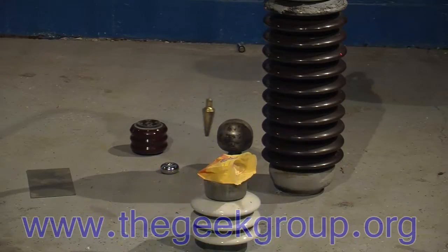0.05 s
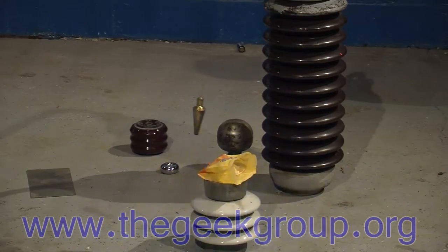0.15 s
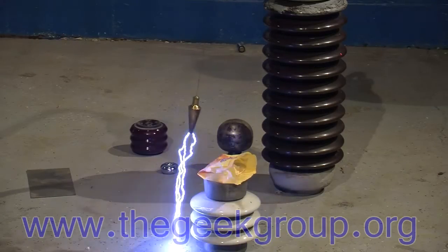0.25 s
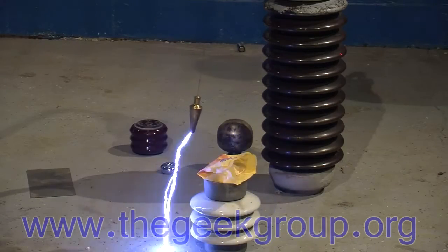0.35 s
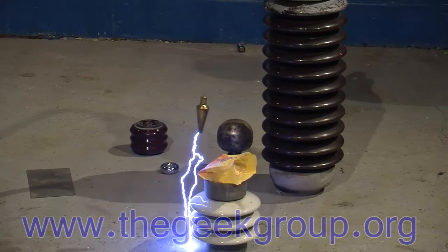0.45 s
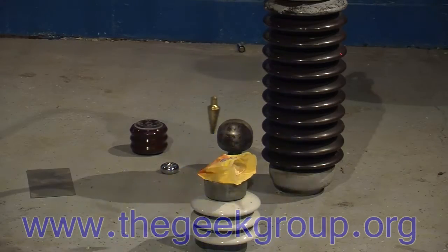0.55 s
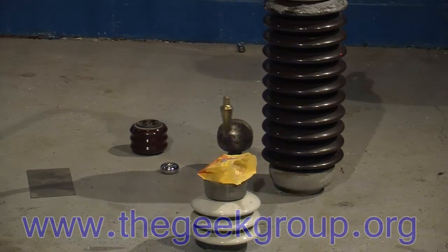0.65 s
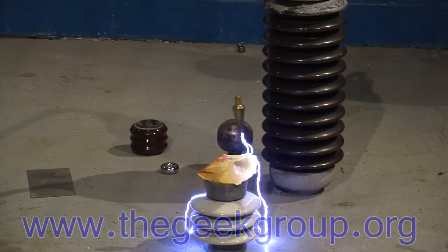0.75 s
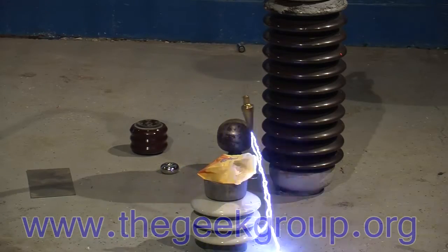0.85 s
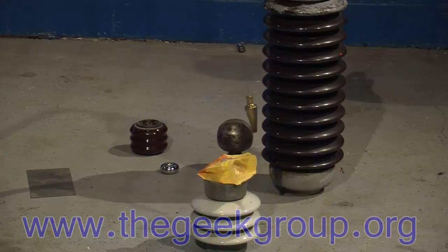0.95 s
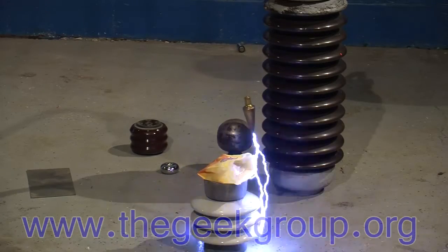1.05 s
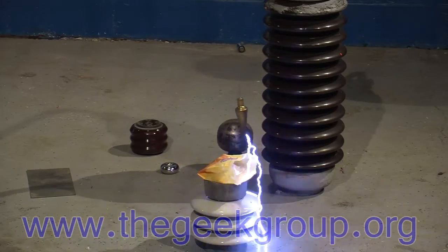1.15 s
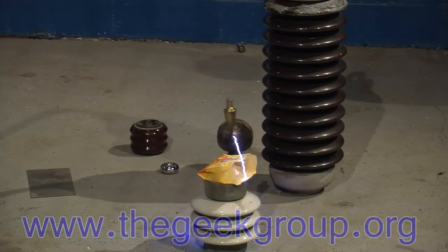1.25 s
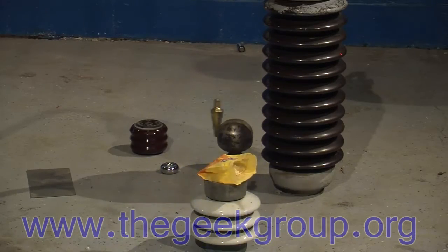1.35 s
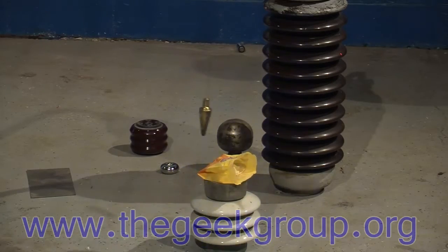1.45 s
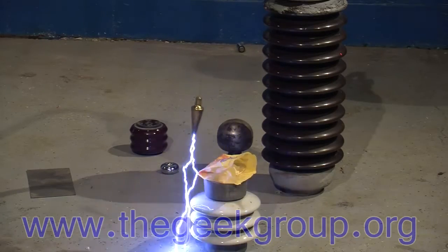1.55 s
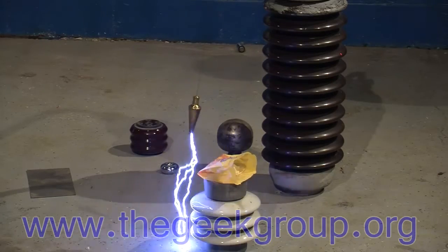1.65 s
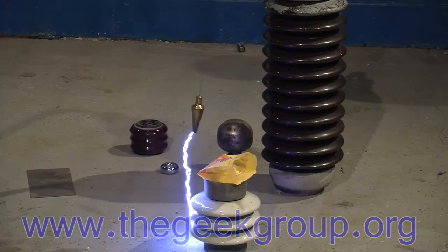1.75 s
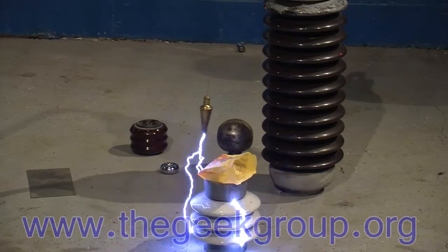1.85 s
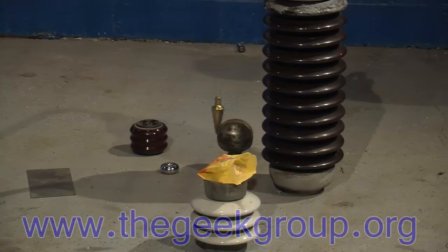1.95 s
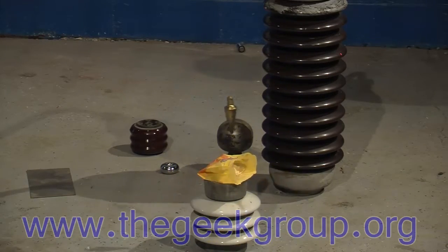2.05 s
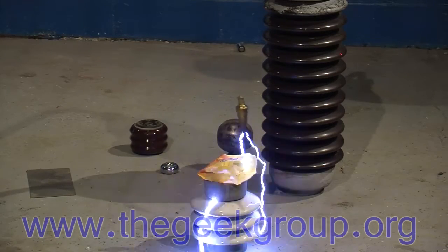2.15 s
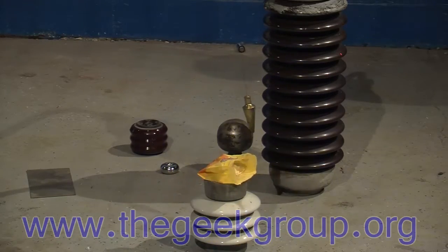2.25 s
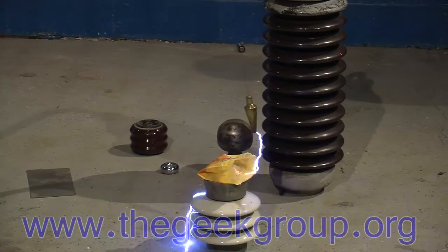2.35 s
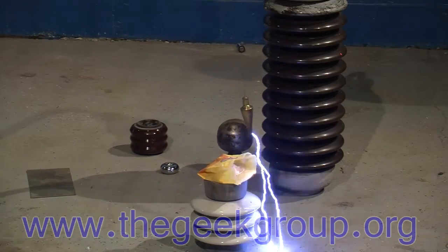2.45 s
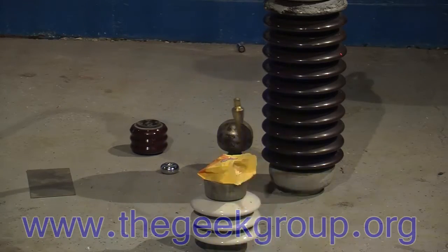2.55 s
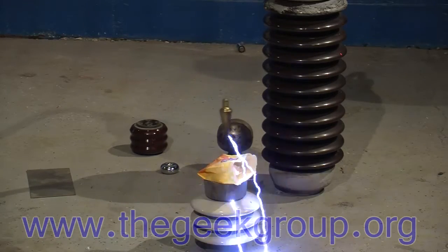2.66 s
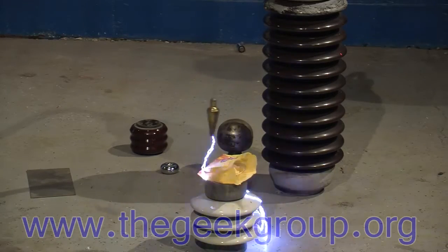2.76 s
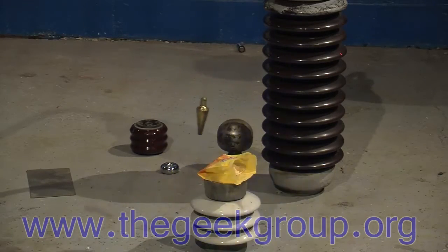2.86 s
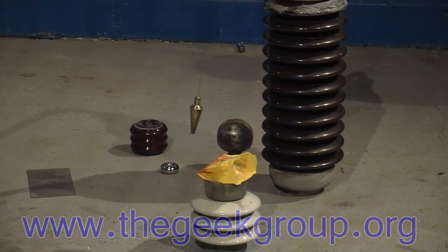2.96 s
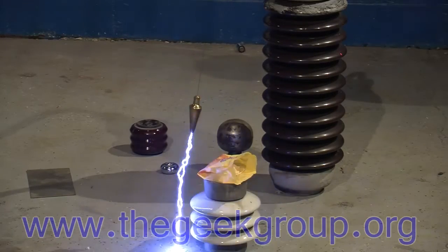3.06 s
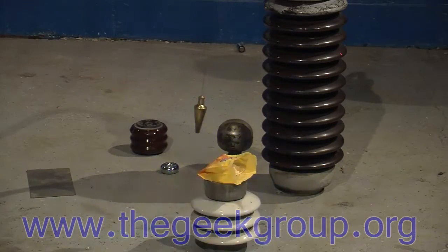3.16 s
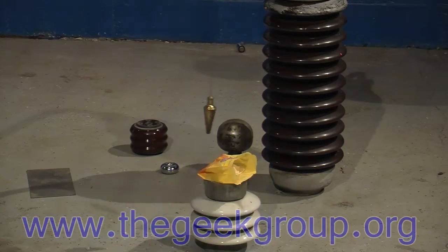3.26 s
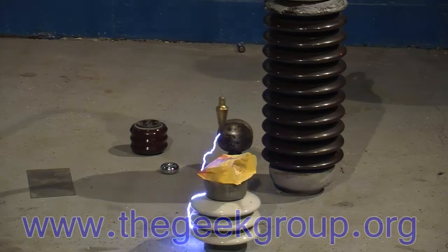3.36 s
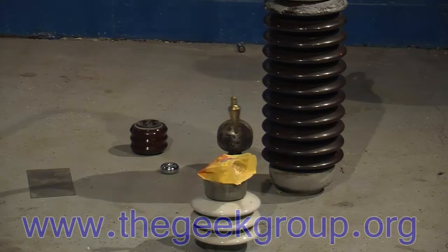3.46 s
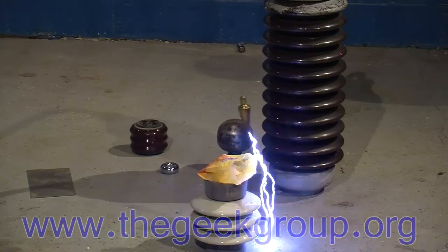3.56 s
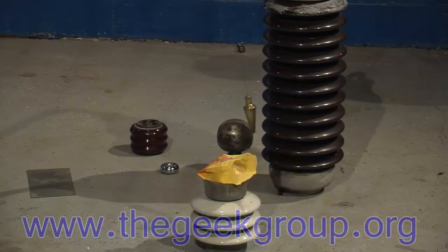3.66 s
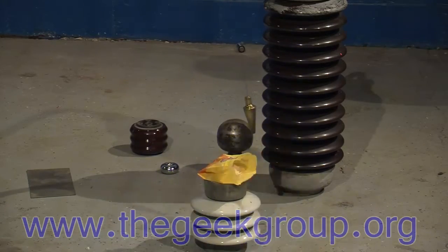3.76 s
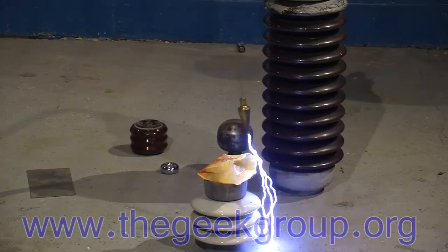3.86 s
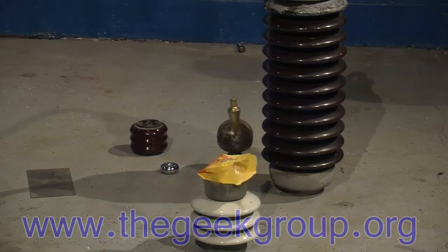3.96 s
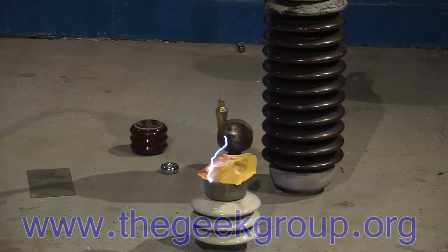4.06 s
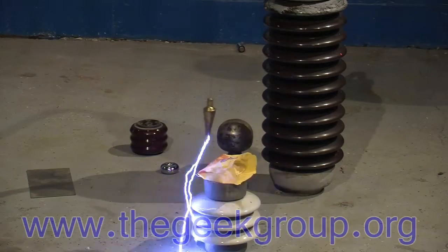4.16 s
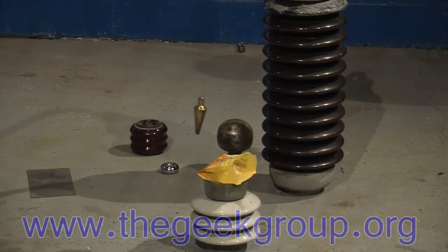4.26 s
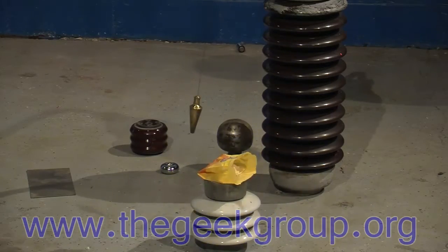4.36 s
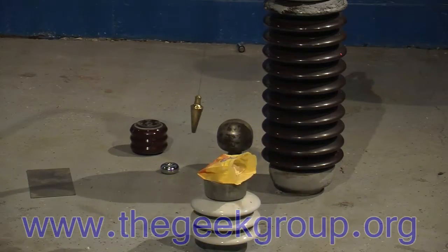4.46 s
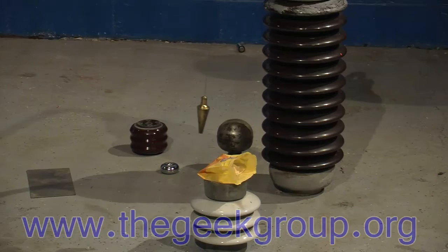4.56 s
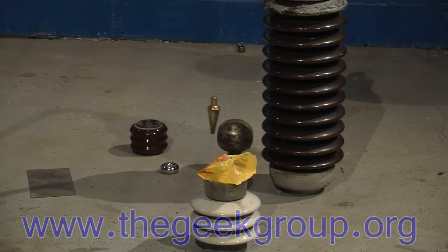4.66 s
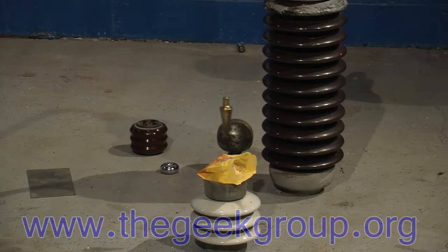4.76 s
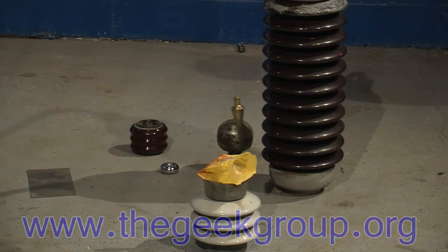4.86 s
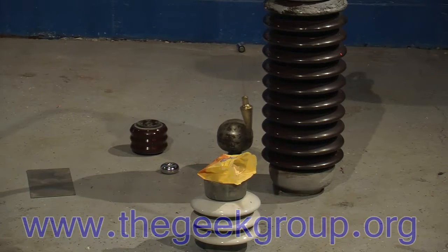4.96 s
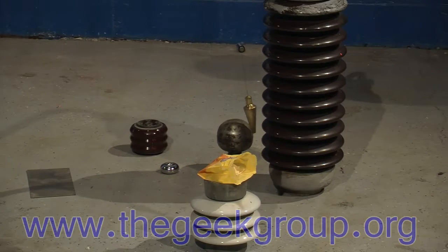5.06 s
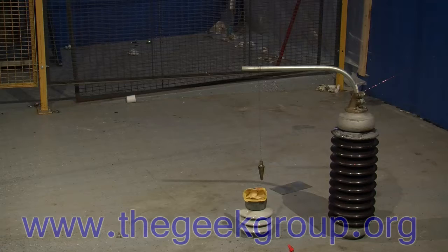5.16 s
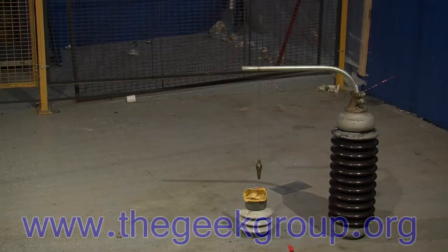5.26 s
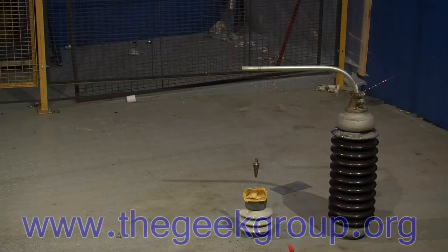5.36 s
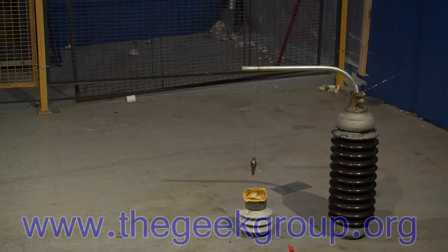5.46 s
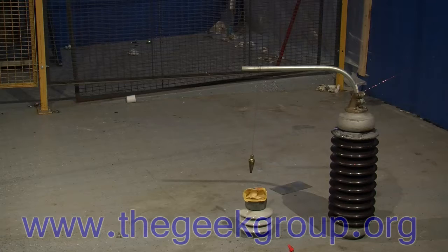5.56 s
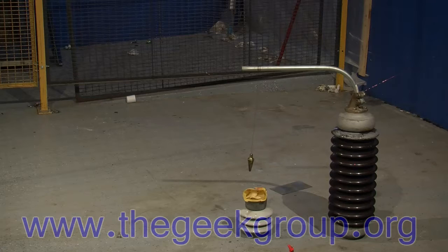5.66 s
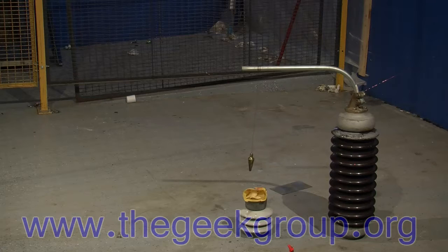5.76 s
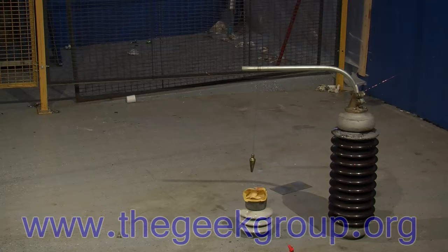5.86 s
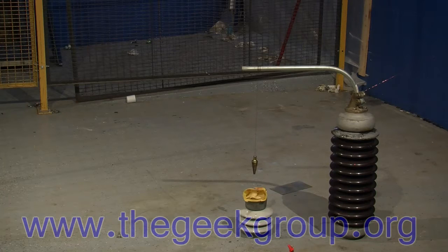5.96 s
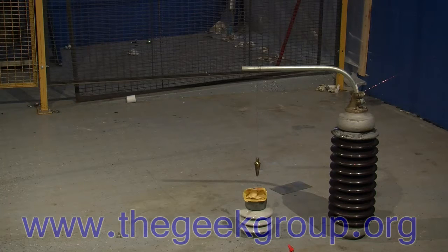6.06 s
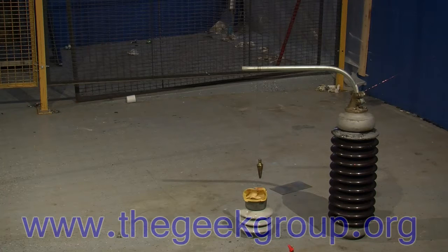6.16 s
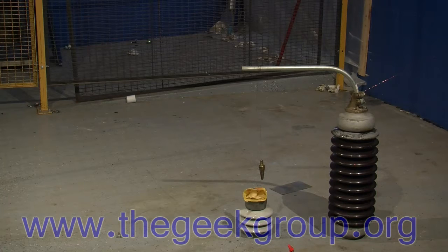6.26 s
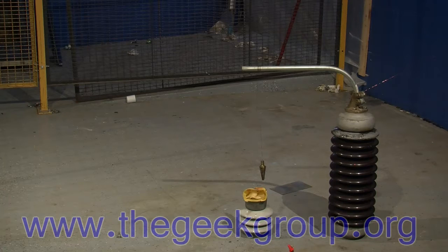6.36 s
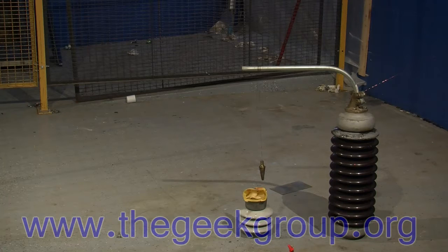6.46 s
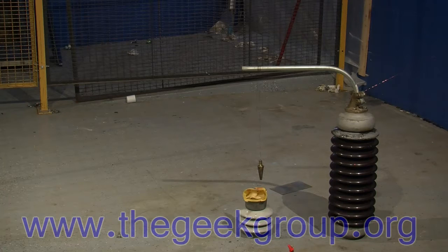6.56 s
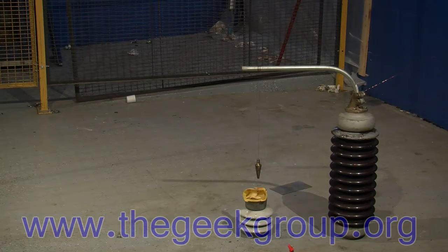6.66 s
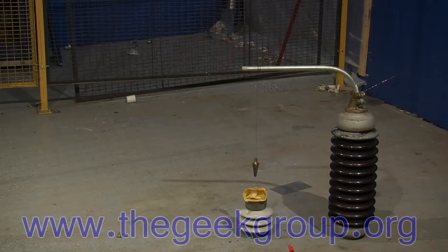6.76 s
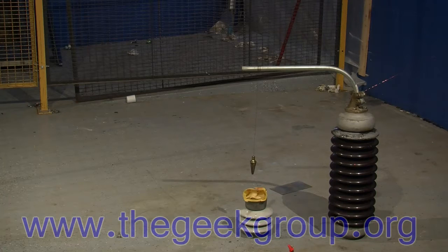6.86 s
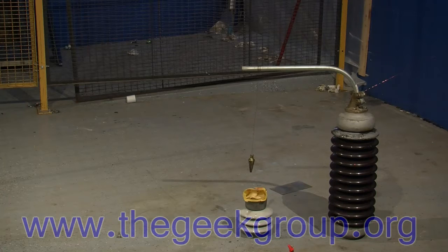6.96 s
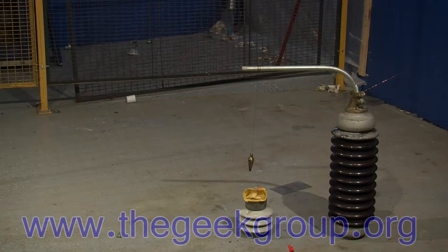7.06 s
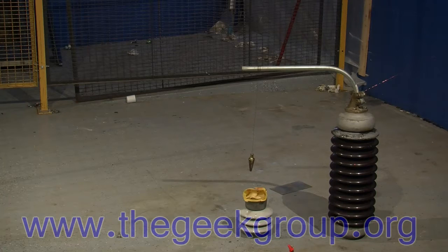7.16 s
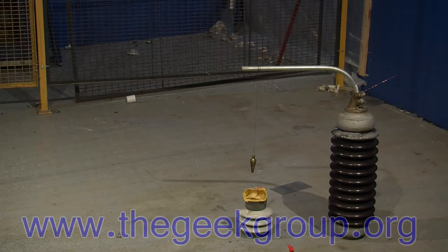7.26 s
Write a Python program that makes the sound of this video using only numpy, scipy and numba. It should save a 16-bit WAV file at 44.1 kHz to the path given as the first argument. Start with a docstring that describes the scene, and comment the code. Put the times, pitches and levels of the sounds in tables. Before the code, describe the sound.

Dense, harsh high-voltage sizzling falters, flares and stops, its echo dying in a large hall before one hard click and quiet shuffling over fan hum.

```python
"""Big concrete hall, one microphone to both channels: a coil throws arcs from a swinging plumb bob to the floor.
From the start, some 600 sparks a second crackle, sizzle, buzz and thump with the mains and the swing,
over supply hum and ventilation; just after 4 s the arc falters, spits, flares and dies at about 4.3 s.
The hall rings out while the recorder's gain recovers, and at 5.2 s this tail drops abruptly in level.
The humming ventilation is left, with one sharp click at 5.5 s and faint ticks and shuffles from 6 s on."""
import sys
import numpy as np
from scipy import signal
from scipy.fft import rfft, irfft
from scipy.io import wavfile
from numba import njit

SR = 44100
rng = np.random.default_rng(int(sys.argv[2]) if len(sys.argv) > 2 else 0)


def file_out(sig):
    """Save sig as 16-bit WAV at sys.argv[1]."""
    # one column per channel
    cols = np.atleast_2d(sig).T
    # limit, then scale
    lim = np.clip(cols, -1, 1)
    pcm = np.round(lim * 32767).astype(np.int16)
    wavfile.write(sys.argv[1], SR, pcm)


N = 321808
LEAD = 2 * SR  # samples run before the start, so that the hall is already full
TIME = np.arange(-LEAD, N) / SR  # s

SPARK_HZ, MAINS_HZ = 620, 60  # SPARK_HZ is one over the median spark spacing
POWER_OFF_S = 4.305
TAIL_DROP_S, TAIL_DROP_DB = 5.21, -18
SWING_S = 1.37  # one full swing of the plumb bob
OVER_BALL_S = 0.65  # a moment when the bob crosses the ball below it, moving right
CROSSING_S = 0.027  # half width of the shortening of the arc around a crossing
TOP_HZ = 15750  # upper limit of the recorder

# Reverberation of the hall. Each row: frequency in Hz, time to decay by 60 dB in s.
HALL_DECAY = [(60, 1.5), (250, 2.62), (600, 2.19), (1200, 2.15), (2000, 1.88), (3500, 1.22), (6000, 0.66),
              (10000, 0.42), (15000, 0.36)]
# The firing turns ragged before the last flare. Each row: time in s, spread of the spark spacing as a share.
SPACING_SPREAD = [(3.8, .18), (4.1, .3)]
# Colour of the crackling channel. Each row: frequency in Hz, relative level in dB.
CRACKLE_COLOUR = [(40, -22.5), (150, -16.5), (300, -13), (450, -4.5), (800, -2), (1200, -2.5), (2000, -1),
                  (3300, 1), (5000, -1.5), (7500, -2), (9700, -5.5), (12300, -5), (15500, -5)]
# Colour of the thin sizzle of the fine branches. Each row: frequency in Hz, relative level in dB.
SIZZLE_COLOUR = [(1000, -20), (3000, -9.5), (5500, -5), (7500, -1), (9700, -1), (12300, 2), (15500, -2.5)]
# Colour of the spark gap's bang. Each row: frequency in Hz, relative level in dB.
BUZZ_COLOUR = [(100, -23), (170, -17), (300, -11.5), (415, -5), (490, -4), (620, -1.5), (800, -4.5),
               (1200, -3), (2500, -10.5), (6000, -21)]
# Pitches at which the buzz rings. Each row: frequency in Hz, width in Hz, relative level in dB.
BUZZ_RESONANCES = [(424, 13, 3), (551.6, 11, 13.5), (615, 10, 8.5)]
# Colour of the push of heated air. Each row: frequency in Hz, relative level in dB.
THUMP_COLOUR = [(15, -16), (35, -7), (60, -7), (110, -3.5), (200, -3), (330, -5), (700, -12), (2000, -81.5)]
# Steady arc, brief falter, last flare. Each row: time in s, power fed to the arc in dB,
# extra level of the buzz in dB, extra level of the bass in dB.
ARC_DRIVE = [(3.85, -1, 3, 1), (4.0, -1, 3, 2), (4.12, -9, 7, -6), (4.16, 2, 4, 2), (4.3, 2, 4.5, 2.5)]
# The arc jumps to a new path; a rise of 0 changes nothing.
# Each row: middle in s, rise of the crackle in dB, half length in s.
PATH_JUMPS = [(0.66, 0, .05), (4.08, 7.5, .03)]
# Colour of the room tone. Each row: frequency in Hz, relative level in dB per Hz.
AIR_COLOUR = [(12, -42), (20, -12), (49, -12), (90, -11.5), (119, -14), (153, -11), (213, -17),
              (245, -16.5), (465, -16.5), (534, -19.5), (667, -19.5), (2400, -35.5), (15500, -39.5)]
# Ventilation hum. Each row: frequency in Hz, level in dB, waver in dB.
FAN_TONES = [(86.4, -48.5, 6), (143.8, -57, 4), (245, -57.5, 3.5), (347, -71, -1)]
# A part is touched, snaps over and rattles to rest. Each row: start in seconds, relative level in dB.
CLICK_CONTACTS = [(5.496, -18), (5.5019, 2), (5.5046, -1), (5.521, -19), (5.531, -16)]
# Colour of the click's crack. Each row: frequency in Hz, relative level in dB.
SNAP_COLOUR = [(250, -30), (550, -12), (900, -0.5), (1300, -3), (2500, -1.5), (4200, -9), (5900, 0),
               (7000, -16), (10000, -13), (15000, -26)]
# Ring of the clicking part. Each row: frequency in Hz, width in Hz, relative level in dB.
CLICK_RESONANCES = [(940, 200, -7), (2410, 110, -1), (3430, 230, -7), (4858, 120, -7), (5800, 170, 0)]
# Small ticks of someone moving about. Each row: start in seconds, level in dB, centre in Hz, decay time in s.
MOVING_TICKS = [(6.014, -40.5, 840, 0.0039), (6.106, -47, 3710, 0.005), (6.136, -45, 1800, 0.0054),
                (6.832, -50, 3400, .01), (6.858, -49, 4970, .006), (7.019, -37, 3100, 0.0044),
                (7.09, -44, 3520, 0.01)]
# Shuffles that swell and fade. Each row: middle in s, level in dB, centre in Hz, half length in s.
MOVING_SHUFFLES = [(6.138, -58, 3200, .04), (6.36, -58, 1800, 0.054), (6.654, -46, 380, .035),
                   (6.92, -42.5, 170, .04), (6.958, -49.5, 1700, 0.065), (7.105, -53, 4800, .025)]


def undb(db):
    """Decibels to gain."""
    return 10 ** (np.asarray(db) / 20)


def unit(x):
    """Scale to rms 1."""
    return x / np.sqrt(np.mean(x ** 2))


def on_log_axis(hz, points):
    """Join (Hz, value) points by straight lines over log frequency."""
    point_hz, value = np.transpose(points)
    return np.interp(np.log(np.maximum(hz, 1)), np.log(point_hz), value)


def convolve(x, response):
    """Pass a sound through an impulse response."""
    return signal.fftconvolve(x, response)[:len(x)]


def colour(x, points, size=4096):
    """Causal filter with the given (Hz, dB) shape, built from its cepstrum."""
    hz = np.arange(size // 2 + 1) * SR / size
    cepstrum = irfft(np.log(undb(on_log_axis(hz, points))))
    # folding the cepstrum forward in time gives minimum phase
    cepstrum[1:size // 2] *= 2
    cepstrum[size // 2 + 1:] = 0
    return convolve(x, irfft(np.exp(rfft(cepstrum))))


def resonate(x, hz, width_hz):
    """One resonance, gain 1 at its centre."""
    b, a = signal.iirpeak(hz, hz / min(width_hz, SR / 4), SR)
    return signal.lfilter(b, a, x)


def bell(t, width_s):
    """A smooth swell, 1 at t = 0."""
    return np.exp(-(t / width_s) ** 2)


def wander(rate_hz):
    """A random, bounded drift that heads for a new value rate_hz times a second."""
    steps = np.tanh(1.3 * rng.standard_normal(8192))
    return np.interp((TIME - TIME[0]) * rate_hz, np.arange(len(steps)), steps)


def pulses(times, sizes):
    """One-sample pressure spikes at the given moments."""
    index = np.round(times.ravel() * SR).astype(int) + LEAD
    return np.bincount(np.maximum(index, 0), sizes.ravel(), len(TIME))[:len(TIME)]


def reverberate(x, build_s=0.0067, size=512):
    """Diffuse tail of the hall: it builds up, then decays; the air swallows the treble first."""
    hz, t, field = signal.stft(rng.standard_normal(2 * SR), SR, nperseg=size)
    decay = np.exp(-np.log(1000) * t / on_log_axis(hz, HALL_DECAY)[:, None])
    build = 1 - np.exp(-t / build_s)
    tail = signal.istft(field * decay * build)[1]
    return convolve(x, tail / np.linalg.norm(tail))


def hall(x, wet_db):
    """Direct sound plus tail, for a source that stays put."""
    return x + undb(wet_db) * reverberate(x)


def shifting_hall(x, wet_db, rate_hz, count):
    """The arc keeps changing its path, so it wakes ever new echo patterns."""
    shares = np.array([wander(rate_hz) for _ in range(count)])
    shares = shares / np.linalg.norm(shares, axis=0)
    return x + undb(wet_db) * sum(reverberate(x * share, build_s=0.02) for share in shares)


def sparks(count=6500):
    """Times and sizes of the breakdowns: uneven in spacing and strength."""
    scatter_db = 3.7
    spread = np.interp(TIME[0] + np.arange(count) / SPARK_HZ, *np.transpose(SPACING_SPREAD))
    chance = rng.standard_normal((count, 2))
    spacing_s = np.exp(spread * chance[:, 0]) / SPARK_HZ
    return TIME[0] + np.cumsum(spacing_s), undb(scatter_db * chance[:, 1])


def surge(times, depth, cycles=1):
    """The sparks grow at the mains crests, once or twice a cycle."""
    return np.exp(depth * np.cos(2 * np.pi * cycles * MAINS_HZ * times))


def channel(times, sizes, spread_s, scatter_db, count):
    """Each kink of the crooked channel sends its own shock; the far ones come later and weaker."""
    shape = (len(times), count)
    distance = rng.random(shape)  # 0 nearest, 1 farthest
    sign = rng.choice([-1, 1], shape)
    strength = undb(scatter_db * rng.standard_normal(shape)) * np.exp(-distance)
    return pulses(times[:, None] + spread_s * distance, sizes[:, None] * sign * strength)


def swing():
    """The bob's lean (1 far left, -1 far right) and its nearness to the ball (1 right above it)."""
    phase = 2 * np.pi * (TIME - OVER_BALL_S) / SWING_S
    from_ball_s = np.sin(phase) * SWING_S / (2 * np.pi)  # distance as time at crossing speed
    return -np.sin(phase), bell(from_ball_s, CROSSING_S)


def arc_levels(crackle_lean_db=1.05, buzz_lean_db=2.5, sizzle_dip_db=-7, thump_dip_db=-7):
    """Level changes in dB: the long arc on the left is fuller; over the ball it shortens and loses branches."""
    lean, near = swing()
    s, *columns = np.transpose(ARC_DRIVE)
    drive, extra_buzz, extra_bass = (np.interp(TIME, s, column) for column in columns)
    spits = sum(rise_db * bell(TIME - middle_s, length_s) for middle_s, rise_db, length_s in PATH_JUMPS)
    crackle = drive + crackle_lean_db * lean + spits
    sizzle = drive + sizzle_dip_db * near
    buzz = drive + extra_buzz + buzz_lean_db * lean
    thump = drive + extra_bass + thump_dip_db * near
    return crackle, sizzle, buzz, thump


def arc(crackle_db=-17, sizzle_db=-15, buzz_db=-29.7, ring_db=-30, ring_lean_db=3, thump_db=-31, fade_s=0.069):
    """The sparks crackle, sizzle and buzz; a ground strike heats the air in thumps at the mains rate."""
    # the levels above balance the parts against each other
    crackle_level, sizzle_level, buzz_level, thump_level = arc_levels()
    power = np.clip((POWER_OFF_S - TIME) / fade_s + .5, 0, 1)
    times, sizes = sparks()
    sizes = sizes * surge(times, depth=.14) * surge(times, depth=.14, cycles=2)
    bangs = pulses(times, sizes)
    heat = bangs * surge(TIME, depth=.42)

    crackle_shocks = channel(times, sizes, spread_s=.0008, scatter_db=4.5, count=2)
    sizzle_shocks = channel(times, sizes, spread_s=.0016, scatter_db=-1.5, count=8)
    crackle = unit(colour(crackle_shocks, CRACKLE_COLOUR))
    sizzle = unit(colour(sizzle_shocks, SIZZLE_COLOUR))
    buzz = unit(colour(bangs, BUZZ_COLOUR))
    thump = unit(colour(heat - heat.mean(), THUMP_COLOUR))
    rings = sum(undb(db) * resonate(power * buzz, hz, width_hz) for hz, width_hz, db in BUZZ_RESONANCES)
    rings = rings * undb(ring_db + ring_lean_db * swing()[0])

    # every part sputters on its own as the channel breaks and re-forms
    crackle = crackle * undb(crackle_level + crackle_db + 1.7 * wander(rate_hz=22))
    sizzle = sizzle * undb(sizzle_level + sizzle_db + 2.2 * wander(rate_hz=22))
    buzz = buzz * undb(buzz_level + buzz_db + 2.4 * wander(rate_hz=30))
    thump = thump * undb(thump_level + thump_db + 6 * wander(rate_hz=18))

    # short waves find a new echo pattern with each small move of the channel, long waves only with large ones
    treble = shifting_hall(power * (crackle + sizzle), wet_db=5, rate_hz=160, count=8)
    middle = shifting_hall(power * buzz, wet_db=3, rate_hz=7, count=3)
    bass = hall(power * thump, wet_db=-10.0)
    return treble + middle + rings + bass


def transformer(hum_db=-43, waver_db=6, waver_hz=10):
    """The supply hums at the mains pitch, swelling and sinking, until the power goes off."""
    power = np.clip((POWER_OFF_S - TIME) / .1, 0, 1)
    hum = np.sin(2 * np.pi * MAINS_HZ * TIME)
    return power * hum * undb(hum_db + waver_db * wander(waver_hz))


def ventilation(air_db=-48, waver_hz=5, drift_rad=2.0):
    """Steady air noise and fan tones that waver in level and pitch."""
    sound = unit(colour(rng.standard_normal(len(TIME)), AIR_COLOUR)) * undb(air_db)
    for hz, db, waver_db in FAN_TONES:
        tone = np.sin(2 * np.pi * hz * TIME + drift_rad * wander(waver_hz))
        sound = sound + undb(db) * unit(tone * undb(waver_db * wander(waver_hz)))
    return sound


def burst(decay_s):
    """A dying puff of noise with unit energy."""
    t = np.arange(SR // 4) / SR
    puff = rng.standard_normal(len(t)) * np.exp(-t / decay_s)
    return puff / np.linalg.norm(puff)


def click(ring_db=-1):
    """A small hard part snaps over: contacts crack and ring short modes; the hall scatters the main crack."""
    s, db = np.transpose(CLICK_CONTACTS)
    contacts = convolve(pulses(s, undb(db)), burst(decay_s=.0009))
    crack = colour(contacts, SNAP_COLOUR)
    ring = sum(undb(mode_db) * resonate(contacts, hz, width_hz) for hz, width_hz, mode_db in CLICK_RESONANCES)
    snap = crack + undb(ring_db) * ring
    main_crack = colour(pulses(s[1:2], np.ones(1)), SNAP_COLOUR)
    near_echo = undb(-12) * convolve(main_crack, burst(decay_s=.04))
    room = near_echo + undb(-12) * reverberate(main_crack)
    # unit energy for the snap, and the room relative to the energy of the main crack
    return undb(-5.5) * (snap / np.linalg.norm(snap) + room / np.linalg.norm(main_crack))


def rub(hz, grain_db=6.5, breadth=1.5):
    """Half a second of gritty friction, coloured by the thing that is rubbed."""
    grit = rng.standard_normal(SR // 2) * undb(grain_db * rng.standard_normal(SR // 2))
    return unit(resonate(resonate(grit, hz, breadth * hz), hz, breadth * hz))


def add(out, s, sound):
    """Mix a sound in from the given moment on."""
    start = LEAD + int(s * SR)
    out[start:start + len(sound)] += sound[:len(out) - start]


def scuffs(catch_db=5):
    """Sharp ticks, and shuffles that catch and slip on grit, die away into the hall."""
    out = np.zeros(len(TIME))
    t = np.arange(SR // 2) / SR
    for s, db, hz, decay_s in MOVING_TICKS:
        add(out, s, undb(db) * rub(hz) * np.exp(-t / decay_s))
    for middle_s, db, hz, half_length_s in MOVING_SHUFFLES:
        catching = undb(catch_db * wander(rate_hz=300)[:len(t)])
        friction = unit(rub(hz) * catching)
        add(out, middle_s - t.mean(), undb(db) * friction * bell(t - t.mean(), half_length_s))
    return hall(out, wet_db=-8.5)


@njit
def follow(x, attack, release):
    """Envelope that rises fast and sinks slowly."""
    out, level = np.empty(len(x)), 0.
    for i in range(len(x)):
        level += (abs(x[i]) - level) * (attack if abs(x[i]) > level else release)
        out[i] = level
    return out


def gain_control(x, top_db=-8.0, attack_s=0.003, release_s=0.097, slope=0.74):
    """The recorder turns down sound whose envelope exceeds top_db and recovers when it ends."""
    envelope = follow(x, 1 / (attack_s * SR), 1 / (release_s * SR))
    return x * np.maximum(envelope / undb(top_db), 1) ** -slope


def scene():
    """The arc and its echo, abruptly lowered late in the tail, over the quiet hall; both channels alike."""
    tail_drop = undb(TAIL_DROP_DB * np.clip((TIME - TAIL_DROP_S) / 0.017, 0, 1))
    sound = undb(3.5) * arc() * tail_drop + transformer() + ventilation() + click() + scuffs()
    return np.tile(gain_control(sound)[LEAD:], (2, 1))


def record(dry):
    """The recorder rounds the tallest spikes and cuts the top."""
    rounded = 1.05 * np.tanh(dry / 1.05)
    lowpass = signal.ellip(12, .1, 80, TOP_HZ, fs=SR, output="sos")
    return signal.sosfilt(lowpass, rounded)


dry = scene()
out = record(dry)
file_out(out)
```